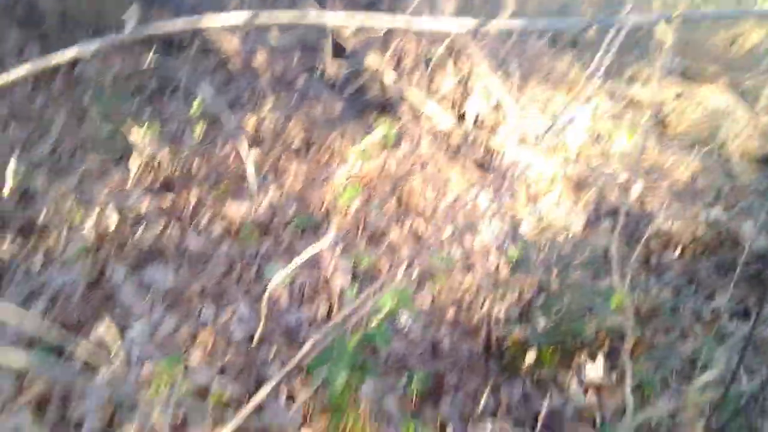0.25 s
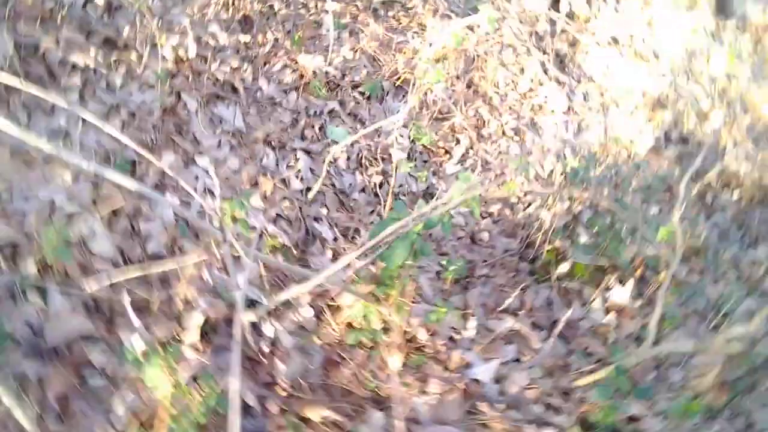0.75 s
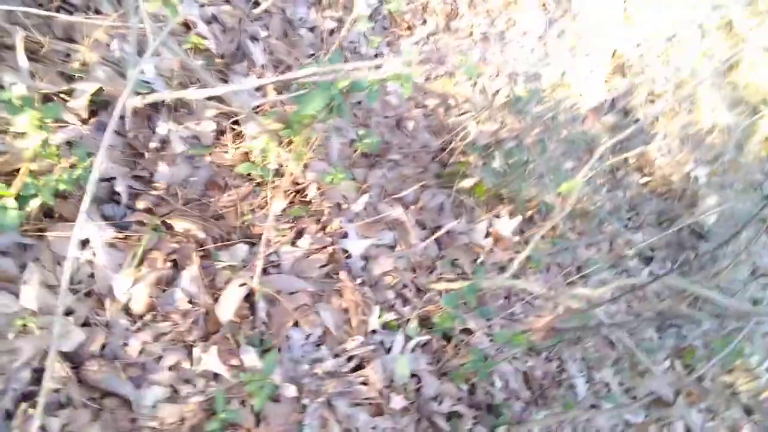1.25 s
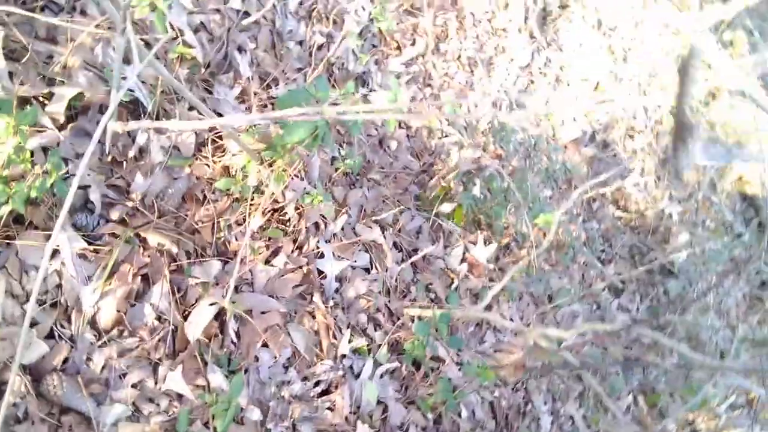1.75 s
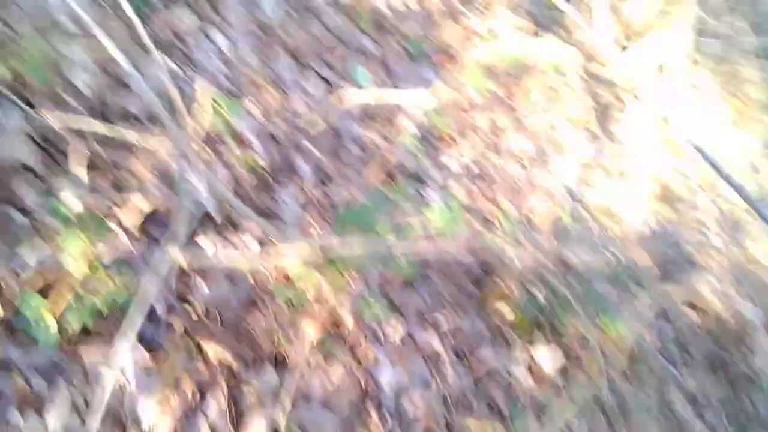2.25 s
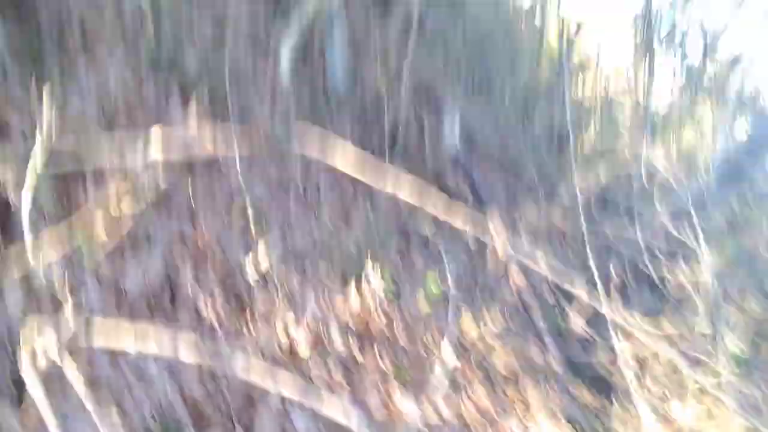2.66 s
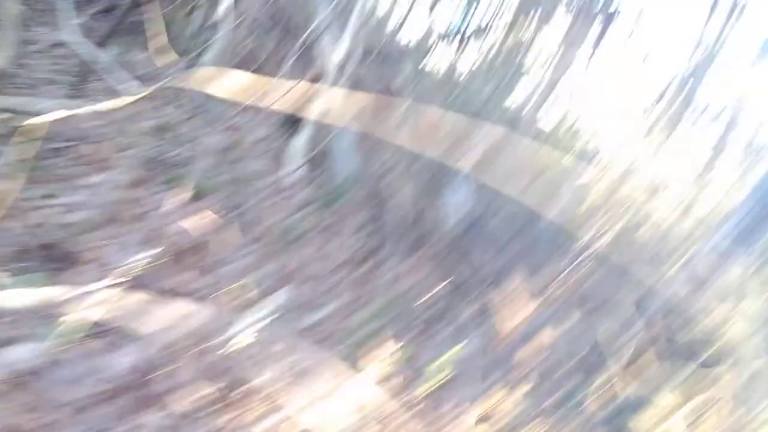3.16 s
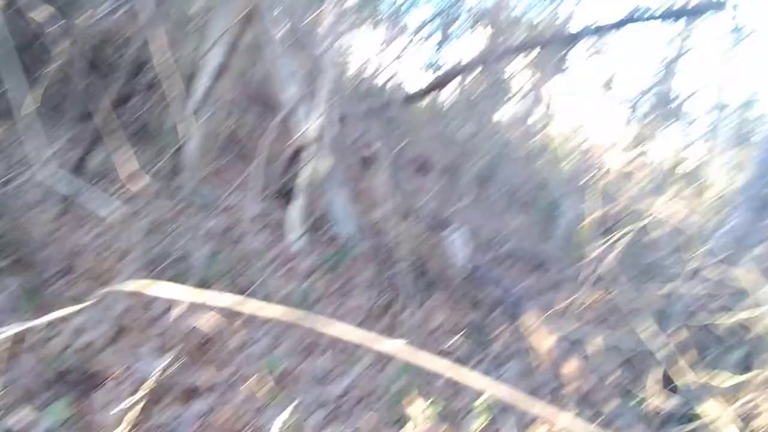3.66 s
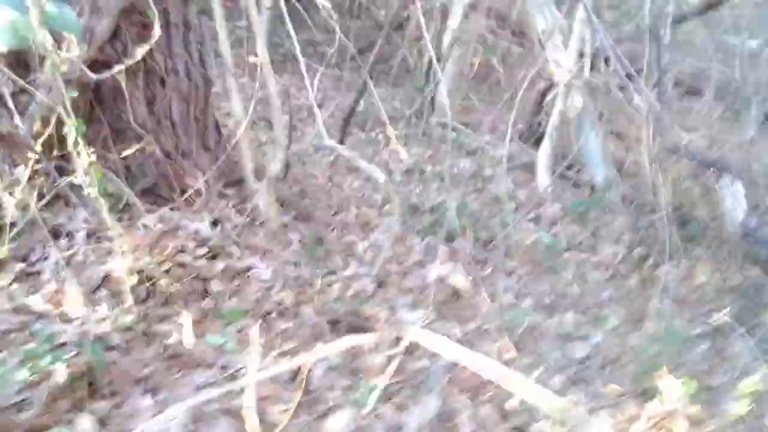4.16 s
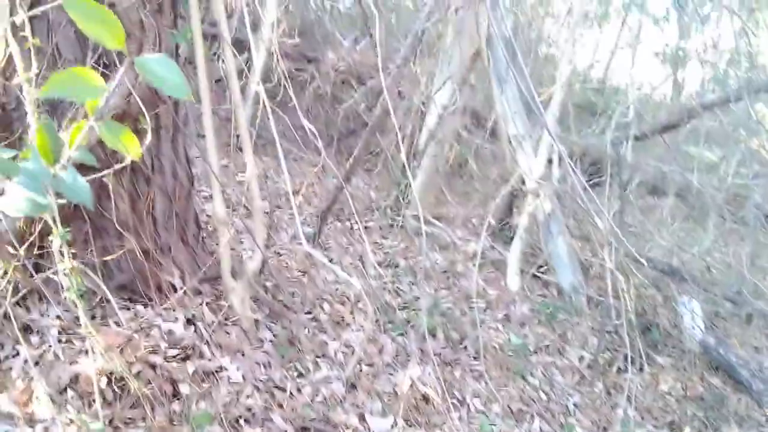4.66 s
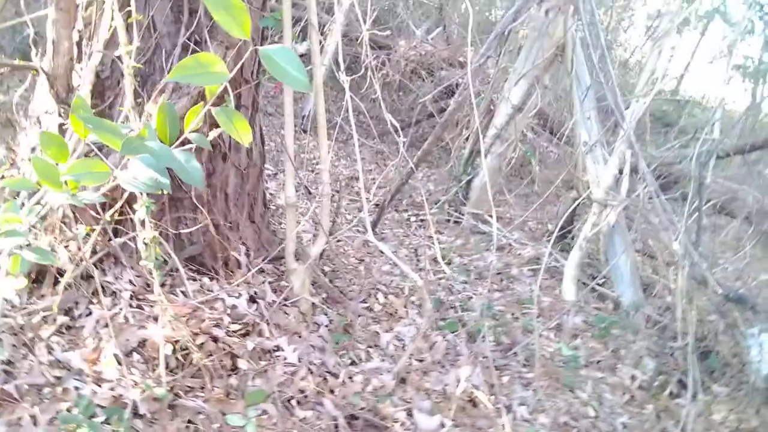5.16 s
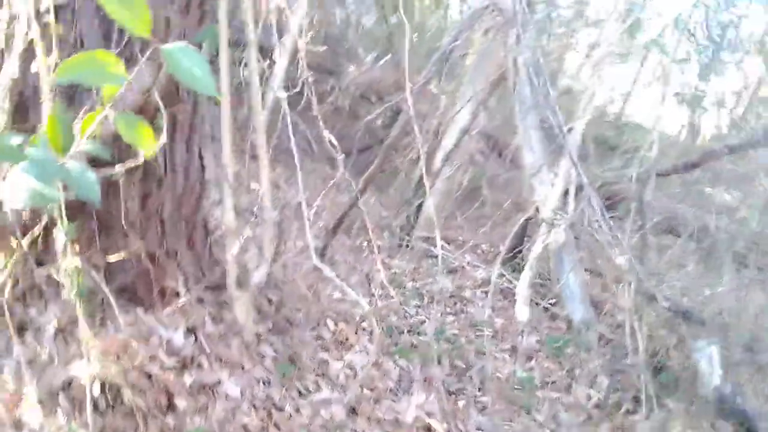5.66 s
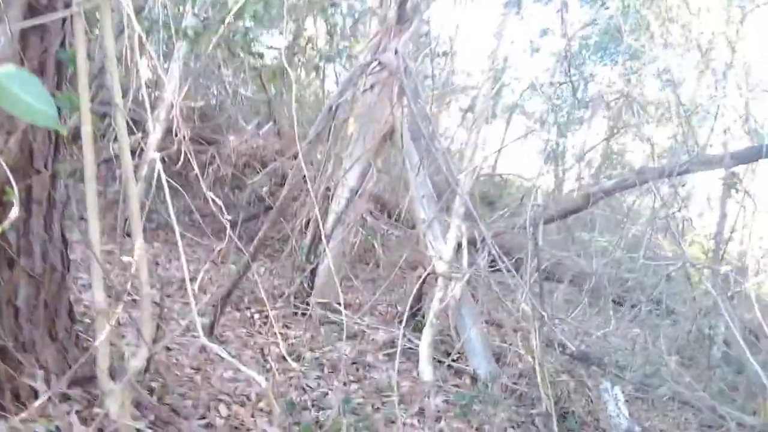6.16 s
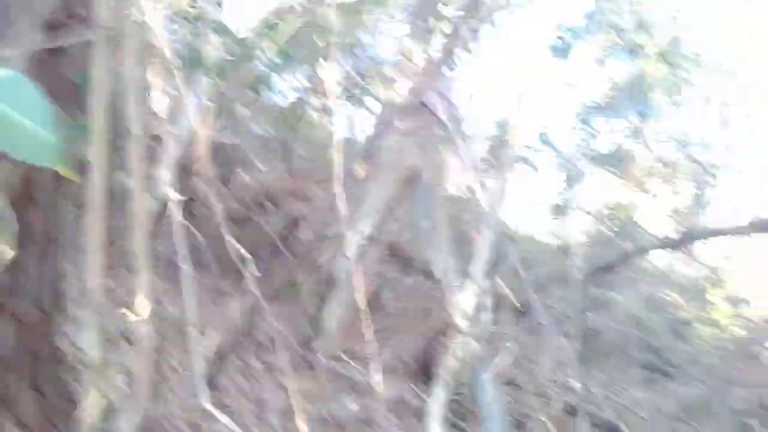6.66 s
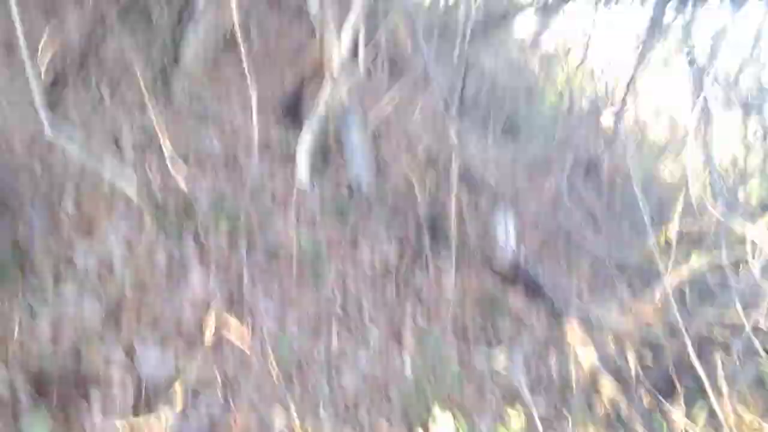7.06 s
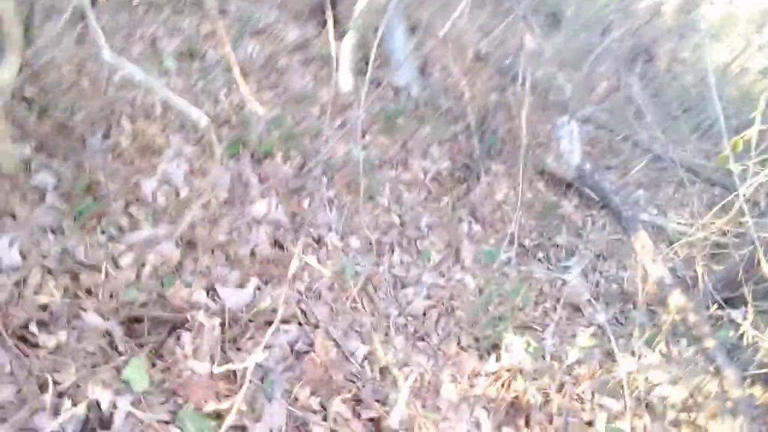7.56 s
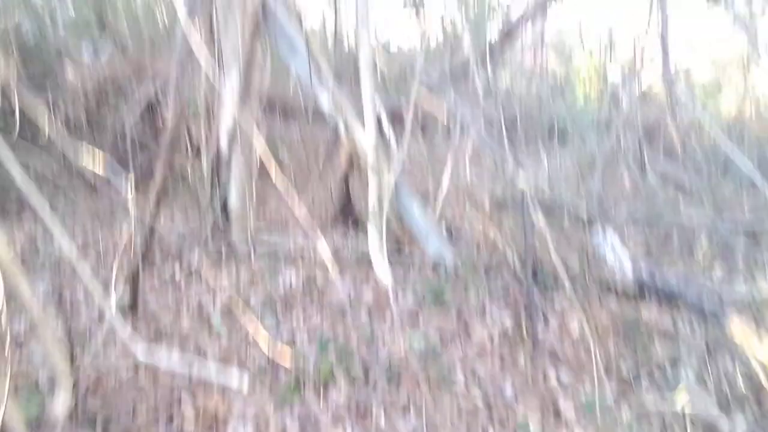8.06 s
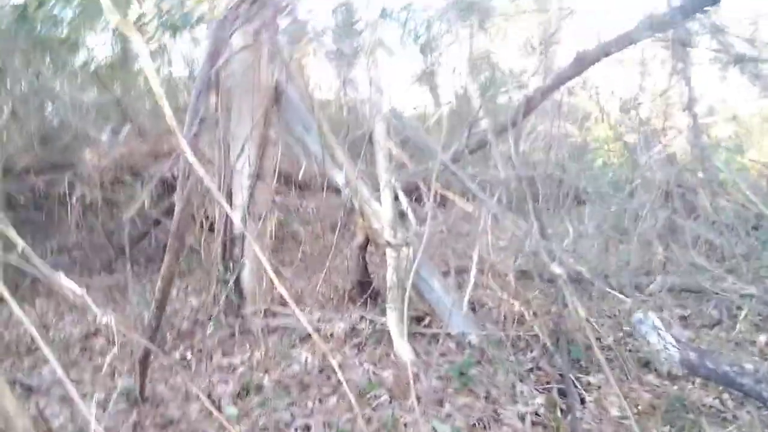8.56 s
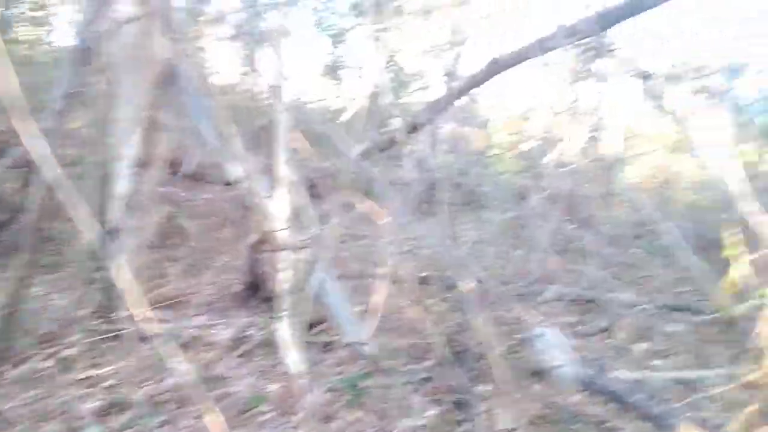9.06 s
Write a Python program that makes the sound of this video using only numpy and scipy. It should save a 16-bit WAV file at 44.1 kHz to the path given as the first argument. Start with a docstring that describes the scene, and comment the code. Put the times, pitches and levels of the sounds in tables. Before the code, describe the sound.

A person with a handheld camera pushes through brush: bright, dry swishes, crumpling leaves and brittle twigs breaking. Hard branch knocks hit near the left microphone early and again around seven seconds. Between them the walker almost stops, leaving soft air and a distant low drone. Steps return, and a dull heel thud and heavier crunches close the walk. Outdoors, dry, with little echo.

```python
"""In a wood, someone walks through dry leaf litter and brush with a camera in hand, and pauses halfway.
Leaves swish, crackle and crumple: filtered noise and thousands of tiny decaying noise grains, swept by strokes.
Twigs snap as clicks with splintering noise through broad resonances; thicker sticks pop as single pulses.
Branches knock on the camera beside its left microphone: a click and tick, then decaying case and branch modes.
A heel thuds on the soil, and a faint engine-like hum of wavering harmonics carries through the still air."""
import sys
import numpy as np
from scipy import signal
from scipy.fft import rfft, irfft, next_fast_len
from scipy.io import wavfile
from scipy.ndimage import map_coordinates

SR = 44100
rng = np.random.default_rng(int(sys.argv[2]) if len(sys.argv) > 2 else 0)


def store_pcm(level_fs):
    """Save levels as 16-bit WAV."""
    pcm = np.round(np.clip(level_fs, -1, 1) * 32767).astype(np.int16)
    wavfile.write(sys.argv[1], SR, np.atleast_2d(pcm).T)


N = 411012

# Spectra give relative colour only: rush() and unit() set the loudness.
# the still wood: (frequency [Hz], density [dB per Hz])
AIR = [(20, -23), (55, -7), (110, -28), (200, -11), (400, -10), (900, -10), (2500, -25), (15000, -40)]
# noise around the hum: (frequency [Hz], density [dB per Hz])
RUMBLE = [(20, -16.5), (45, -21.5), (78, -14.5), (115, -15), (170, -22.5), (400, -47)]
# dry leaves: (frequency [Hz], density [dB per Hz])
CRISP = [(500, -17.5), (1500, -16), (3000, -1), (5000, 1), (8000, -0.5), (10500, 2), (13000, -1),
         (15500, -7)]
# pressed litter: (frequency [Hz], density [dB per Hz])
DEEP = [(60, -36), (180, -8.5), (350, 3.5), (600, 3), (1000, 3), (1800, 2.5), (3000, -5), (6000, 0.5),
        (14000, -14)]
# how far left and right agree in diffuse noise: (frequency [Hz], likeness [-1 to 1])
ALIKE = [(60, 0.57), (290, 0.53), (640, 0.47), (1400, 0.035), (3000, 0.16), (15000, 0.13)]
# the distant hum: (time [s], fundamental [dB], third harmonic [dB], faint overtones [dB])
HUM = [(0, -49, -69, -71), (.7, -51.5, -75, -73), (1.1, -52.5, -63, -70), (1.65, -59.5, -91, -97),
       (2.2, -51, -70, -68.5), (2.65, -49.5, -68, -71), (3.05, -52.5, -57.5, -62), (3.3, -52, -62.5, -71),
       (3.5, -51.5, -53.5, -62.5), (3.75, -50, -56, -61), (3.9, -49.5, -68, -72), (4.1, -52.5, -54, -63),
       (4.33, -60, -66, -75), (4.55, -54, -54, -68), (4.75, -54, -51, -69), (5.05, -54, -52.5, -69),
       (5.35, -49, -57.5, -65), (5.55, -51.5, -62, -75), (5.8, -55, -58, -67), (5.98, -53, -59.5, -71),
       (6.3, -83, -64.5, -70.5), (6.58, -80, -71, -72.5), (6.75, -70, -63, -66.5), (6.97, -75, -72, -71),
       (7.3, -59, -78, -85), (7.55, -68, -92, -89), (7.67, -78, -98, -96), (7.85, -65, -80, -84),
       (8.12, -79, -73, -90), (8.35, -60, -64, -81), (8.75, -56.5, -75, -81), (9.15, -64.5, -61.5, -73)]
# the faint overtones: (multiple of the fundamental, level on top of the hum's column [dB])
OVERTONES = [(2, -3), (4, -5), (5, -2.5)]
# a heel on the soil: (time [s], level [dB], boom pitch [Hz], boom t60 [s])
THUDS = [(8.263, -39.5, 147, 0.23)]
# branches striking the camera: (time [s], overall level [dB], tick [Hz], left-right of the contact [dB],
# case ring [dB], centre of the ring [Hz], thump [dB], branch pitch [Hz], branch ring [dB])
KNOCKS = [(0.9628, 6.5, 1260, 25, -13.5, 585, -40, 326, -40),
          (.971, -6.5, 2150, 24, -6, 414, -27, 315, -34), (1.0064, -17, 2700, 28, -2, 900, -14, 327, -13),
          (1.015, -21, 1200, 14, -7, 760, -25, 221.6, -5), (1.0249, -5.5, 2600, 28, -5, 730, -18, 226, -33),
          (1.0326, -27, 1200, 18, 9, 383, -5, 317, -14), (1.044, -27, 1100, 27, 0, 760, -20, 220, -9),
          (7.0747, 2.5, 1730, 20, -12, 1050, -39, 166.3, -23.5),
          (7.1476, -3, 1940, 17, -6, 430, 0, 166.6, -26.5)]
# camera case modes: (frequency [Hz], typical relative level [dB], t60 [s])
CASE = [(228, -9, 0.038), (314, -11.5, 0.049), (423, -5.5, 0.029), (471, -38, 0.26), (580, -8, .022),
        (700, -15, 0.035), (823, -10, 0.034), (860, -13, 0.035), (963, -13, 0.025), (1590, -5.5, 0.025)]
# bending modes of a branch: (multiple of its pitch, relative level [dB], t60 [s])
BRANCH = [(1, -8.5, 0.29), (2.74, -22, 0.31)]
# the woody pop of a thicker stick giving way: (time [s], peak [dB], pitch [Hz], left-right [dB])
STICKS = [(0.1001, -24, 700, 0), (0.1827, -22, 600, -1), (3.3733, -23.5, 1020, 6), (4.186, -19.5, 700, -2),
          (8.4758, -31, 400, 0)]
# the clearest twigs and brittle leaves breaking: (time [s], level before snaps() trims it [dB],
# pitch [Hz], resonance [Q], left-right [dB], t60 [s])
SNAPS = [(.0166, -21, 8500, 0.23, 6, 0.015), (.05, -19, 6300, 0.2, -4, 0.0027),
         (.0874, -20, 7900, 0.21, 9, 0.004), (.17, -24, 9300, 0.46, -2, .004),
         (.101, -11.5, 10600, 0.29, -2, 0.0086), (.1825, -30, 2000, 0.46, 4, 0.0086),
         (.2286, -29, 8700, 0.43, -1, .005), (.2456, -10.5, 6800, 4.1, -1, 0.0015),
         (.307, -23, 5000, 0.34, -2, 0.028), (.336, -20, 3970, 0.056, 7, 0.0065),
         (.3579, -20, 5900, 0.26, -14, 0.0072), (.366, -11.5, 4340, 0.19, 4, 0.0077),
         (.371, -20, 8000, 0.3, -5, 0.003), (.391, -19, 6500, 0.15, 1, 0.0039),
         (.622, -32, 5570, 0.86, 3, 0.0061), (.6609, -30, 10600, 0.57, -3, 0.0043),
         (.6797, -35, 9200, 0.5, -9, .004), (.754, -30, 9000, .6, -4, .004),
         (.8044, -20, 6000, 0.31, 0, 0.013), (.9073, -16, 6700, 0.26, -5, 0.023),
         (.9286, -28, 7160, 0.91, 5, 0.0062), (1.0643, -27, 3670, 0.17, 2, 0.033),
         (1.1445, -24, 9000, 0.28, -1, 0.027), (1.1518, -37, 8600, .5, -4, 0.004),
         (1.168, -17, 7800, 0.55, -6, 0.018), (1.2693, -22, 9000, .6, -14, 0.0026),
         (1.275, -24.5, 8300, 0.2, -12, .013), (1.3962, -30.5, 10000, 0.53, -3, 0.0037),
         (1.4512, -33, 8000, 0.46, -3, .004), (1.4925, -30.5, 8300, 0.51, -12, 0.017),
         (1.5859, -40, 11000, 0.64, -13, .004), (1.9295, -25.5, 10500, 0.68, -15, 0.015),
         (1.9513, -26.5, 8000, 0.88, -14, 0.014), (2.0417, -23, 7660, 1.2, -11, 0.0034),
         (2.1272, -27, 10000, .6, -11, .003), (2.1461, -31, 9000, 0.66, -7, 0.0094),
         (2.1809, -30, 7500, 0.58, -9, .012), (2.2276, -15.5, 8200, 0.95, -10, 0.0091),
         (2.2386, -17, 11500, 0.27, -13, 0.0091), (2.3496, -26, 10000, 0.84, -12, .009),
         (2.4007, -22, 9900, 0.47, -5, 0.012), (2.473, -28, 9500, 0.65, 2, .007),
         (2.6174, -18, 6300, 0.26, 1, 0.024), (2.6274, -19.5, 9600, 0.91, -11, 0.012),
         (2.6611, -23, 7900, 0.57, -2, 0.011), (2.6667, -18.5, 8200, 1.6, -8, 0.0051),
         (2.7054, -29, 7000, 0.95, 5, .004), (2.7127, -33, 8000, .6, -4, .003),
         (2.752, -23.5, 9000, 0.7, -5, .005), (2.7594, -24.5, 9000, 0.68, -3, .004),
         (2.7991, -22, 7200, 0.081, 4, 0.0044), (2.813, -22.5, 9000, .5, -3, .005),
         (2.8915, -30, 10000, .6, -9, .004), (2.9163, -19, 9350, 0.6, 2, 0.0035),
         (2.9537, -30, 9000, .6, -4, .004), (2.9627, -24.5, 9000, 0.52, -2, .005),
         (2.9893, -29, 11000, .8, -4, .004), (2.9986, -26.5, 10600, 0.7, -12, .005),
         (3.0417, -24.5, 7500, 0.28, -1, 0.004), (3.1712, -24, 9200, .5, 3, 0.0071),
         (3.1805, -28, 9000, .6, 0, 0.0032), (3.2223, -35, 10400, .5, 1, 0.0018),
         (3.3735, -11, 8500, 0.52, -2, 0.014), (3.4378, -21, 9000, 0.69, -4, .004),
         (3.459, -28, 9700, 0.54, -3, 0.003), (3.48, -40, 8000, .5, 2, .004),
         (3.5244, -21.5, 5500, 0.27, 1, 0.0024), (3.5482, -31, 8000, .6, -4, .004),
         (3.6038, -30, 7000, 0.36, -1, .004), (3.6261, -12, 9700, 0.3, 9.5, 0.0011),
         (3.6902, -34, 9000, 0.47, -9, .006), (3.7208, -32, 9000, 0.41, -9, .006),
         (3.8351, -42, 9000, 0.65, -6, .004), (3.9167, -17, 8200, 0.26, -10, 0.034),
         (4.1861, -16, 2900, 1.1, 2, 0.0075), (4.5351, -39, 9000, 0.68, -4, .004),
         (4.7894, -43, 8000, 0.54, -5, .004), (4.9051, -35, 8000, 0.39, -12, .004),
         (5.156, -39, 3250, 3.7, 6.5, 0.0077), (5.542, -40.5, 9000, 0.83, -12, 0.0074),
         (5.6438, -43, 8000, 0.71, -3, .005), (5.654, -25, 11000, 0.37, -2, .006),
         (5.6775, -21, 11300, 1.1, -20, 0.0041), (5.7534, -33, 8000, 0.45, -3, 0.005),
         (5.7698, -28.5, 10800, 0.29, -5, 0.0042), (5.7955, -31.5, 7000, 0.94, 0, .003),
         (5.829, -22, 8200, 0.52, -3, 0.057), (5.8588, -29, 9500, 0.87, -16, .02),
         (5.873, -29, 10000, 0.82, -9, 0.011), (5.885, -29, 8000, 0.67, -18, 0.0071),
         (5.8881, -22, 9350, 0.49, -9.5, 0.009), (5.9137, -33, 10000, 0.76, -3, .005),
         (5.9493, -28, 8000, 0.39, 1, 0.007), (5.9835, -30, 9000, 0.85, -7, .004),
         (6.0067, -33, 9500, 0.58, -2, .003), (6.0412, -34, 9000, 0.9, -5, 0.0032),
         (6.0887, -33, 9000, .6, -6, .004), (6.1686, -28, 9800, 0.85, -4, 0.0056),
         (6.2081, -22, 6330, 1.2, -1, 0.0031), (6.2193, -33, 7000, .6, -9, .003),
         (6.2692, -36, 11000, 0.95, -9, 0.0061), (6.2772, -29, 9000, 0.43, -7, 0.0082),
         (6.2927, -26, 8000, 0.72, -4, .004), (6.3347, -24, 5900, 2.5, 4, 0.0048),
         (6.39, -26, 6200, 1, 0, 0.0058), (6.4082, -39, 8000, 0.74, -1, 0.0024),
         (6.45, -32, 11000, 0.48, -5, 0.0052), (6.4588, -33, 7000, 0.54, 0, 0.0036),
         (6.4684, -20.5, 5500, 0.89, -5, 0.0029), (6.4701, -16, 12200, 0.99, 0, 0.0071),
         (6.503, -18.5, 12000, 0.51, -8, 0.0073), (6.5266, -24.5, 9500, 0.32, -9, .009),
         (6.5333, -26, 10900, 0.61, -10, .01), (6.5802, -21.5, 11000, 0.62, -4.5, 0.0044),
         (6.6016, -25, 10600, 0.97, -12, .006), (6.6201, -30, 10000, 0.76, -10, .003),
         (6.7174, -27, 9500, 0.99, -6, 0.0084), (6.7248, -28, 8000, .6, -2, 0.0044),
         (6.7413, -34, 10000, 0.68, -5, .004), (6.7886, -32, 9000, .6, -4, .004),
         (6.8724, -26, 10100, 1.7, -9, .004), (6.9235, -26.5, 10000, 0.93, -5, 0.0043),
         (6.9628, -30, 10200, 0.61, 1, 0.0083), (7.001, -28, 8000, 0.7, -1, 0.028),
         (7.2467, -32, 6800, .4, -7, .01), (7.4442, -26.5, 9400, 0.49, -4, 0.0037),
         (7.5152, -39, 9000, 0.73, -6, .003), (7.5424, -30, 10800, 4.2, -10, .003),
         (7.5742, -33, 9200, .5, -5, .004), (7.6324, -28.5, 11400, 0.58, -3, 0.0025),
         (7.7175, -41, 10000, .6, -4, .003), (7.756, -30, 1210, 1.3, -1, 0.0058),
         (7.774, -32, 9700, 1, -8, .003), (7.7987, -41, 10000, .6, -6, .003),
         (7.8077, -33, 10000, .6, -3, .003), (7.8643, -35, 9000, .6, -2, .003),
         (7.9642, -36, 9000, .6, -7, .003), (7.9788, -34, 10000, .6, -5, .003),
         (8.003, -36, 1460, 1.9, 1, 0.0025), (8.1098, -31, 6440, 0.095, -2, 0.0044),
         (8.16, -34, 7770, .4, -6, .01), (8.321, -26, 9100, .4, 1, .008),
         (8.3472, -18, 11500, 0.11, 3, 0.016), (8.3776, -32, 9000, .6, -5, .004),
         (8.3986, -28, 10800, .5, -10, 0.0036), (8.4258, -28, 8000, .6, -1, .004),
         (8.436, -17.5, 5500, 0.074, -2, 0.013), (8.4758, -17, 9400, 0.35, -8, 0.0035),
         (8.517, -18, 9700, 0.56, -4, .003), (8.623, -32, 10000, .6, -2, .003),
         (8.6437, -15.5, 9300, 1.2, -8, 0.0025), (8.649, -21, 9500, 0.44, 2, .008),
         (8.6679, -17, 7400, 0.38, -1, 0.011), (8.7229, -23.5, 8000, 0.91, -3, .006),
         (8.7751, -31, 8000, 0.55, -4, .003), (8.8281, -29, 8000, 0.42, 1, .004),
         (8.9882, -25, 7300, 0.21, 0, 0.0059), (9.1078, -19, 7660, 0.33, 0, 0.0088),
         (9.1233, -28, 8000, 0.38, -2, 0.0037), (9.1639, -40, 6000, .6, 1, .004),
         (9.3072, -26, 4940, 0.51, 4, 0.0031)]
# colour common to all snaps: (frequency [Hz], gain [dB])
SNAP_TONE = [(200, -11), (1000, 4.5), (3000, 0), (5000, -2), (9800, 2), (12500, 1.5), (15500, -1.5)]
# leaves crumpling and scuffing under a shoe: (time [s], level before crumples() trims it [dB],
# pitch [Hz], left-right [dB], length [s])
CRUMPLES = [(0.363, -27, 2120, 13, 0.009), (0.417, -21, 7960, -2, 0.041), (1.238, -20, 6600, -2, 0.059),
            (1.695, -23, 11200, -20, 0.035), (1.74, -16, 10500, -8, 0.027), (2.213, -20, 9100, -14, 0.051),
            (2.8, -23, 9000, 7, 0.02), (3.372, -13.5, 9150, 2, 0.027), (3.625, -13, 9000, -4, 0.019),
            (3.905, -17, 10700, -11, .025), (4.136, -30, 890, -3, 0.018), (4.14, -25, 5200, 3, 0.039),
            (4.156, -26.5, 4200, 3, 0.068), (5.933, -13, 9000, -7, 0.0056), (8.215, -15, 6000, -4, 0.0081),
            (8.226, -15.5, 5550, -1, 0.023), (8.346, -9.5, 10200, -1, 0.011), (9.012, -34.5, 670, 2, 0.034),
            (9.102, -28, 540, 5, 0.01)]
# a foot or leg sweeps through the litter: (time of full strength [s], hold [s], crisp leaves [dB],
# deep pressed litter [dB], left-right of the treble before litter() leans it right [dB])
STROKES = [(0.0, 0.11, -29, -42, -4.5), (0.351, 0.03, -35.5, -44, -11), (0.441, 0.03, -41, -49, 0),
           (0.653, 0.13, -43.5, -53.5, -4), (0.804, 0.08, -38, -51, -7), (1.168, 0.1, -32.5, -48.5, -8),
           (1.446, 0.06, -38.5, -55, -9), (1.701, 0.06, -34.5, -48, -11), (1.89, 0.19, -36, -52.5, -11),
           (2.083, 0.44, -34.0, -49, -12.5), (2.214, 0.026, -28.0, -48, -9),
           (2.582, 0.08, -29.5, -43.5, -7), (2.79, 0.03, -28.5, -43.5, -5.5), (2.928, 0.025, -36, -50, -16),
           (3.14, 0.1, -36.5, -48, -8), (3.353, 0.19, -34, -50.5, -3.5), (3.623, 0.25, -43.5, -55, -13),
           (3.904, 0.02, -30, -46, -4), (3.997, 0.2, -37, -51, -11), (4.277, 0.12, -48.5, -58.5, -5),
           (4.502, 0.03, -40, -55, -16), (4.703, 0.42, -54.5, -60, -12.5), (5.303, 0.07, -59, -83, -16.5),
           (5.568, 0.32, -49.5, -58, -17.5), (5.92, 0.11, -37.5, -48, -15.5), (6.107, 0.1, -40, -52, -9),
           (6.236, 0.125, -37.5, -49, -13), (6.525, 0.07, -35.5, -49, -9), (6.676, 0.16, -45, -54, -6),
           (6.916, 0.13, -37.5, -50, -10), (7.133, 0.17, -39.5, -52, -2), (7.34, 0.1, -37, -50.5, -1.0),
           (7.581, 0.4, -51, -56, -13.5), (8.086, 0.026, -51.5, -59, -13), (8.207, 0.18, -34, -46, 1),
           (8.441, 0.24, -32, -45.5, -3), (8.747, 0.21, -33.5, -46.5, -1.5), (9.068, 0.055, -33.5, -46, 0),
           (9.297, 0.04, -46.5, -54, 5)]

TOP_HZ = 15650  # upper band limit
THUMP_HZ, THUMP_S = 194, 0.0052  # the whole camera is jolted: pitch and t60
ATTACK_S, RELEASE_S = 0.33, 0.3  # time a stroke takes to swell and to die away by 60 dB
SETTLE_DB, SETTLE_S = -7, 1.6  # the disturbed leaves settle more slowly: level and t60
STIR_DB = -65  # the litter is never quite still
# stalk level against the deep layer when that layer is at STALK_PRESS_DB; dB gained per dB of pressure
STALK_DB, STALK_PRESS_DB, STALK_GROWS = -0.5, -50.5, 0.53
# small chance snaps: usual level before the snap trim, dB gained per dB of rustle, random spread
TWIGLET_DB, TWIGLET_GROWS, TWIGLET_SPREAD_DB = -34.5, 0.8, 1.5
TWIGLET_HZ, TWIGLET_Q, TWIGLET_S = 10500, 1, 0.027  # their central pitch, resonance Q and t60
BREAK_SIZE = 3.9  # the first clean break against the splintering
SNAP_BODY = 0.29  # share of a snap that spreads far below its pitch


def amp(db):
    """Decibels to gain."""
    return 10 ** (np.asarray(db) / 20)


def decay(t, t60):
    """A gain that falls by 60 dB in t60 seconds."""
    return amp(-60 * t / t60)


def unit(x):
    """Scale to rms 1."""
    return x / np.sqrt(np.mean(x ** 2) + 1e-20)


def along(points, hz):
    """Read (frequency, value) points on a log frequency axis."""
    f, v = np.transpose(points)
    return np.interp(np.log(hz + 1), np.log(f), v)


def curves(rows):
    """One value per sample for each column after the time."""
    s, *cols = np.transpose(rows)
    return [np.interp(np.arange(N) / SR, s, c) for c in cols]


def wobble(rate):
    """A smooth random curve, rate knots a second."""
    knots = rng.standard_normal(8192)
    return map_coordinates(knots, [np.arange(N) * rate / SR], mode="mirror")


def filtered(x, response):
    """Filter x by a response given as a function of frequency."""
    n = x.shape[-1]
    m = next_fast_len(n + 4096)
    return irfft(rfft(x, m) * response(np.fft.rfftfreq(m, 1 / SR)), m)[..., :n]


def resonance(f, hz, q):
    """Causal response of one resonance."""
    return 1j * f * hz / q / (hz * hz - f * f + 1j * f * hz / q)


def sides(pan_db):
    """Left and right gains for a level difference."""
    return amp(np.reshape([pan_db / 2, -pan_db / 2], (2, -1)))


def add(track, s, sound):
    """Mix a stereo sound in at time s."""
    i = max(0, round(s * SR))
    track[:, i:i + sound.shape[1]] += sound[:, :N - i]


def rush(spectrum):
    """Diffuse stereo noise of rms 1: mid and side shares set how far the two sides agree at each frequency."""
    def mid_and_side(hz):
        turn = np.arccos(np.clip(along(ALIKE, hz), -1, 1)) / 2
        return amp(along(spectrum, hz)) * [np.cos(turn), np.sin(turn)]

    mid, side = filtered(rng.standard_normal((2, N)), mid_and_side)
    return unit(np.array([mid + side, mid - side]))


def scatter(x, t60, wet_db):
    """Ground and stems throw back a short diffuse tail."""
    t = np.arange(SR // 8) / SR
    tail = rng.standard_normal((2, len(t))) * decay(t, t60) * (t > .001)
    tail /= np.linalg.norm(tail, axis=1, keepdims=True)
    mono = x[::-1] / 2 + x / 2
    return x + amp(wet_db) * signal.fftconvolve(mono, tail, axes=1)[:, :N]


def still_air():
    """The quiet wood: a very soft, steady diffuse noise."""
    return amp(-64.5) * rush(AIR)


def hum():
    """A far engine drones at a nearly steady pitch; its harmonics swell and fade separately among the trees."""
    low_db, third_db, faint_db = curves(HUM)
    pitch_hz = 80.15 + 0.23 * wobble(4.6)
    phase = 2 * np.pi * np.cumsum(pitch_hz) / SR
    faint = sum(amp(faint_db + db + 3.4 * wobble(4.0)) * np.sin(round(k) * phase) for k, db in OVERTONES)
    third = amp(third_db + 1.3 * wobble(9)) * np.sin(3 * phase)
    fundamental = np.sqrt(2) * amp(0.47 * wobble(11.0)) * np.sin(phase)
    low = fundamental + amp(-8.0) * rush(RUMBLE)
    return amp(low_db) * low + np.sqrt(2) * (third + faint)


def thuds():
    """A heel lands with a dull puff and a short boom of the soil."""
    out, t = np.zeros((2, N)), np.arange(SR // 3) / SR
    for s, db, hz, t60 in THUDS:
        dull = filtered(rng.standard_normal(len(t)), lambda f: resonance(f, 180, 0.99) ** 2)
        puff = unit(dull) * decay(t, 0.26)
        boom = np.sin(2 * np.pi * hz * t) * decay(t, t60) * (1 - np.exp(-t / 0.02))
        add(out, s, amp(db) * sides(0) * (amp(-3.0) * puff + amp(3.5) * boom))
    return out


def knocks():
    """A branch ticks on the camera; the case is jolted and rings briefly, and the branch itself quivers on."""
    out, t = np.zeros((2, N)), np.arange(SR // 3) / SR

    def ring(hz, db, t60):
        return np.sin(2 * np.pi * hz * t) * amp(db) * decay(t, t60)

    def bass_cut(f):
        return resonance(f, 90, 0.8) * 1j * f * 0.8 / 90

    for s, db, hz, pan_db, case_db, ring_hz, thump_db, branch_hz, branch_db in KNOCKS:
        tick = np.cos(2 * np.pi * hz * t) * decay(t, 0.003)
        grit = amp(-6.5) * rng.standard_normal(len(t)) * decay(t, 0.004)
        strike = amp(-8) * (t == 0)  # hard wood meets the case: one full-band click
        # the case muffles a narrow band
        muffled = lambda f: resonance(f, hz, 0.039) * (1 - 0.2 * resonance(f, 1270, 14))
        contact = filtered(amp(-2.5) * tick + grit + strike, muffled)
        modes = sum(ring(f, level + rng.normal(0, 1), t60) for f, level, t60 in CASE)
        case = amp(case_db) * filtered(modes, lambda f: resonance(f, ring_hz, 3.2))
        branch = sum(ring(k * branch_hz, branch_db + level, t60) for k, level, t60 in BRANCH)
        body = filtered(case + branch + ring(THUMP_HZ, thump_db, THUMP_S), bass_cut)
        # the right side is softer
        add(out, s, amp(db) * (contact * amp([[0], [-pan_db]]) + body * amp([[0], [-8]])))
    return out


def sticks():
    """A thicker stick lets go all at once: a single broad pulse in the low mids."""
    out, pulse = np.zeros((2, N)), signal.unit_impulse(SR // 30)
    for s, db, hz, pan_db in STICKS:
        pop = filtered(pulse, lambda f: resonance(f, hz, 0.41) ** 2)
        add(out, s, amp(db) * sides(pan_db) * pop / np.abs(pop).max())
    return out


def twiglets(crisp_db, pan_db, count):
    """Rows of small snaps at random moments: more of them, and somewhat louder, where the leaves move most."""
    chance = np.cumsum(amp(crisp_db / 2))
    draws = (np.arange(count) + rng.random(count)) / count
    at = np.searchsorted(chance / chance[-1], draws)
    level_db = TWIGLET_DB + TWIGLET_GROWS * (crisp_db - np.median(crisp_db))
    rows = []
    for i, (size, pitch, side) in zip(at, rng.standard_normal((count, 3))):
        db = level_db[i] + TWIGLET_SPREAD_DB * size
        hz = TWIGLET_HZ * np.exp(.22 * pitch)
        rows.append((i / SR, db, hz, TWIGLET_Q, pan_db[i] + 3 * side, TWIGLET_S))
    return rows


def snaps(twigs):
    """A twig or leaf rib parts with one sharp crack, mostly a touch later on the left; its fibres splinter."""
    out, t = np.zeros((2, N)), np.arange(SR // 30) / SR
    for s, db, hz, q, pan_db, t60 in twigs:
        fade = decay(t, t60) + amp(-34) * decay(t, 0.03)
        shared = rng.standard_normal(len(t)) * fade + BREAK_SIZE * (t == 0)
        lag = rng.integers(0, 13)  # samples
        own = 1.24 * fade * rng.standard_normal((2, len(t)))
        burst = np.array([np.roll(shared, lag), shared]) + own

        def colour(f):
            thin = f ** 2 / (f ** 2 + 1300 ** 2)  # a thin twig radiates little bass
            peak = resonance(f, hz, q)
            return peak * (peak * thin + SNAP_BODY) * amp(along(SNAP_TONE, f))

        crack = filtered(burst, colour)
        add(out, s, amp(db - 13.0) * sides(pan_db) * np.array([unit(c) for c in crack]))
    return out


def crumples():
    """A curled leaf collapses in a quick run of noise whose strength jumps in tiny steps."""
    out, t = np.zeros((2, N)), np.arange(SR // 10) / SR
    for s, db, hz, pan_db, length in CRUMPLES:
        u = 4 * t / length
        give = np.repeat(rng.standard_normal(len(t)), 32)[:len(t)]  # a new strength every 32 samples
        noise = rng.standard_normal((2, len(t))) * amp(2.9 * give)
        run = filtered(noise, lambda f: resonance(f, hz, 0.53) ** 2)
        add(out, s, amp(db - 9.0) * sides(pan_db) * unit(run) * u * np.exp(1 - u))
    return out


def strides():
    """Each stroke swells, holds and dies away; gives the crisp level, the deep level and the bearing, in dB."""
    t = np.arange(0, N / SR, .002)
    start, hold, crisp_db, deep_db, pan_db = np.transpose(STROKES)[:, :, None]
    before, after = np.maximum(start - t, 0), np.maximum(t - start - hold, 0)
    settling = amp(SETTLE_DB) * decay(after, SETTLE_S)
    shape = decay(before, ATTACK_S) * np.hypot(decay(after, RELEASE_S), settling)
    # overlapping strokes add in power, and the stronger one steers the bearing
    crisp, deep = (amp(crisp_db) * shape) ** 2, (amp(deep_db) * shape) ** 2
    bearing_db = (pan_db * crisp).sum(0) / crisp.sum(0)
    crisp_level_db = 10 * np.log10(crisp.sum(0))
    deep_level_db = 10 * np.log10(deep.sum(0) + amp(STIR_DB) ** 2)
    return curves(np.transpose([t, crisp_level_db, deep_level_db, bearing_db]))


def fractures(pitch_hz, spread, q, t60, size_db, clump_db, count, size=192):
    """Tiny leaf fractures in clumps, each with its own pitch, strength and direction; rms 1."""
    chance = np.cumsum(amp(clump_db * wobble(45)))
    start = np.searchsorted(chance / chance[-1], rng.random(count))
    pitch, life, pan, lag = rng.standard_normal((count, 4)).T
    strength = amp(size_db * (rng.exponential(size=count) % 3))
    fade = decay(np.arange(size) / SR, t60 * np.exp(0.65 * life[:, None]))
    burst = rng.standard_normal((count, size)) * fade
    colour = resonance(np.fft.rfftfreq(size, 1 / SR), pitch_hz * np.exp(spread * pitch[:, None]), q)
    grain = irfft(rfft(burst) * colour)
    grain *= (strength / np.linalg.norm(grain, axis=1))[:, None]
    delay = np.clip(np.round(10 + 5 * lag), -15, 15).astype(int)  # samples by which the left side lags
    where = np.abs([start + delay, start])[:, :, None] + np.arange(size)
    tracks = [np.bincount(w.ravel(), (grain * g[:, None]).ravel(), N)[:N]
              for w, g in zip(where, sides(3 * pan))]
    return unit(np.array(tracks))


def swish():
    """Countless leaf edges rubbing: partly diffuse, partly straight from the feet, right side first."""
    diffuse, direct = rush(CRISP), rush(CRISP)[0]
    return unit(diffuse + amp(-7) * np.array([np.roll(direct, 12), direct]))


def litter(crisp_db, deep_db, pan_db):
    """Sliding leaves swish and crackle; the shoe's weight grinds the deeper layer and its stalks."""
    def leaf_tone(hz):
        return amp(along(CRISP, hz))

    # leaves catch and let go
    catch = amp(2.3 * wobble(90) + 2.1 * wobble(350))
    crackle = fractures(pitch_hz=8000, spread=0.35, q=1.4, t60=0.0055, size_db=5.0, clump_db=3, count=4500)
    crackle = unit(filtered(scatter(crackle, t60=0.04, wet_db=-6), leaf_tone))
    # now and then a whole leaf buckles, longer than a single fracture
    buckles = fractures(pitch_hz=8300, spread=0.15, q=1.0, t60=0.018, size_db=2.5, clump_db=2,
                        count=650, size=768)
    buckles = unit(filtered(buckles, leaf_tone))
    leaves = amp(-5.2) * catch * swish() + amp(-5.0) * crackle + amp(-7.8) * buckles
    crisp = amp(crisp_db) * leaves
    # the camera shades only the shortest waves from its far microphone
    treble = filtered(crisp, lambda hz: 1 - 1 / (1 + (hz / 7800) ** 6))
    treble_shift = (sides(pan_db) * amp([[-2], [1]]) - 1) * treble
    # a harder press breaks more stalks
    stalk_db = STALK_DB + STALK_GROWS * (deep_db - STALK_PRESS_DB)
    crunch = fractures(pitch_hz=2580, spread=0.47, q=2.5, t60=0.0035, size_db=0.5, clump_db=3, count=4500)
    stalks = amp(stalk_db) * scatter(crunch, t60=.025, wet_db=-11.5)
    deep = amp(-1.0) * catch * rush(DEEP) + stalks
    return crisp + treble_shift + amp(deep_db) * deep


def scene():
    """The walk, with a faint answer from the ground and trees, over the hum and the still air."""
    crisp_db, deep_db, pan_db = strides()
    breaking = snaps(SNAPS + twiglets(crisp_db, pan_db, count=70)) + sticks()
    cracks = scatter(breaking, t60=0.025, wet_db=-11)
    walk = scatter(litter(crisp_db, deep_db, pan_db) + cracks + crumples(), t60=0.24, wet_db=-16)
    return still_air() + hum() + thuds() + knocks() + walk


def record(dry):
    """The camera clips at full scale, then a very steep low-pass removes what lies above its band limit."""
    return filtered(np.clip(dry, -1, 1), lambda hz: 1 / np.sqrt(1 + (hz / TOP_HZ) ** 160))


dry = scene()
out = record(dry)
store_pcm(out)
```